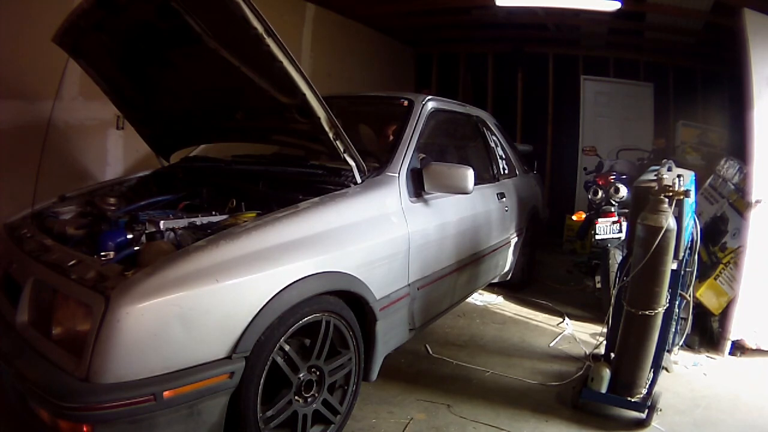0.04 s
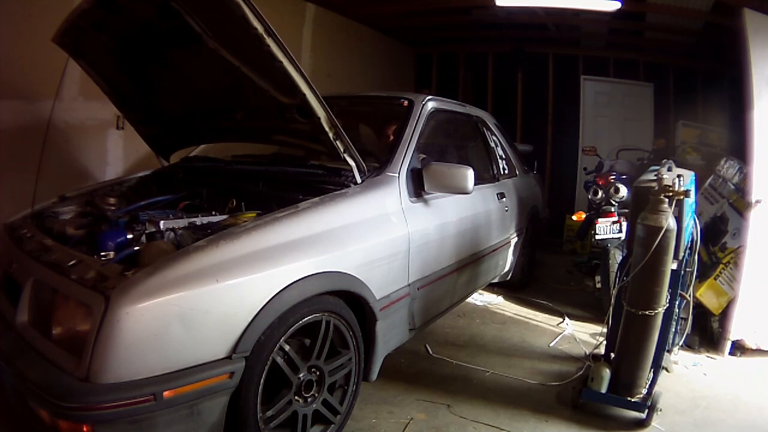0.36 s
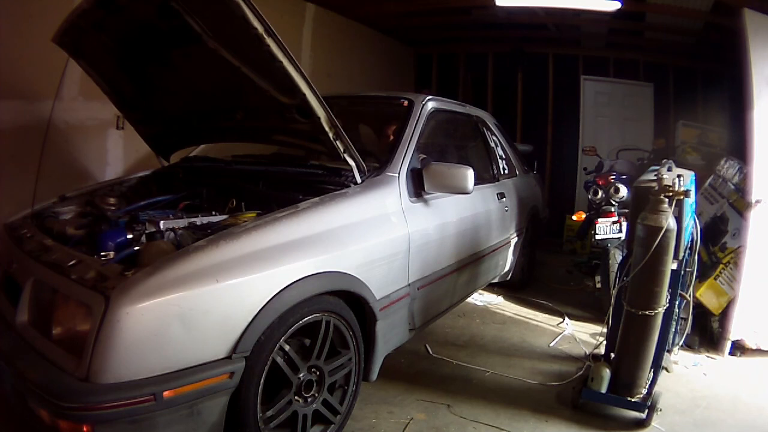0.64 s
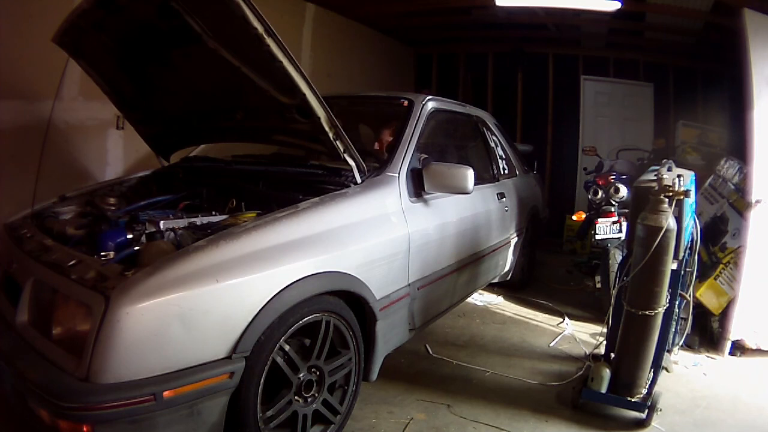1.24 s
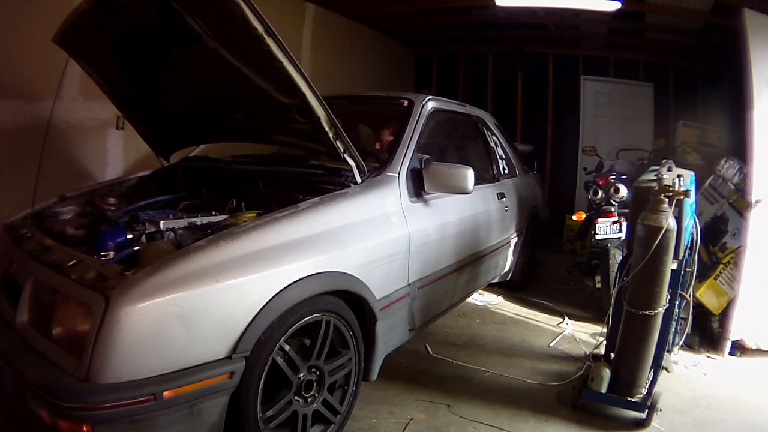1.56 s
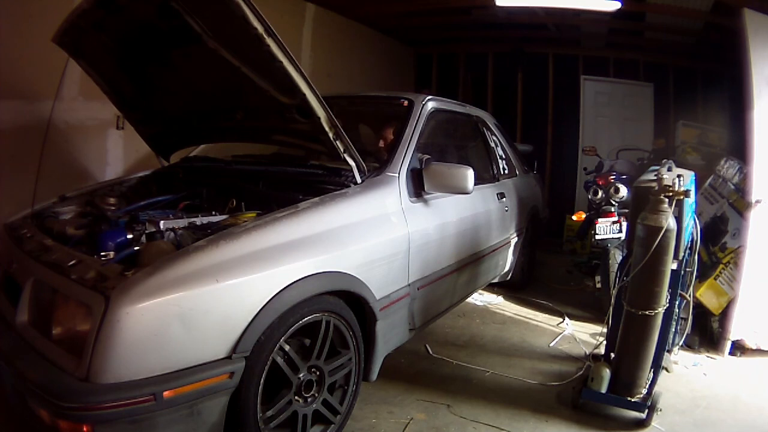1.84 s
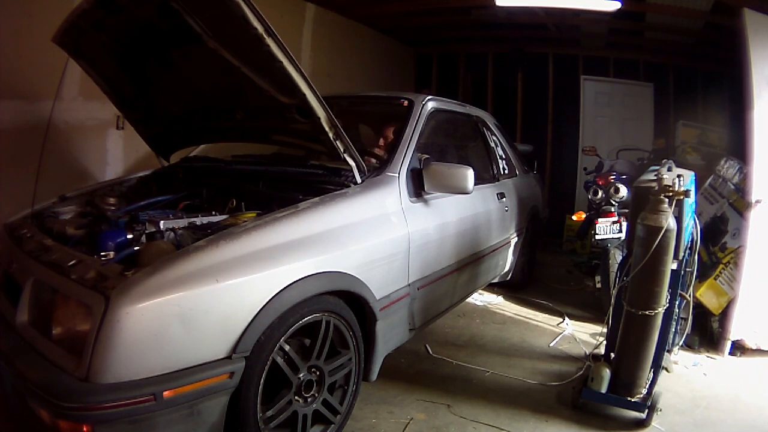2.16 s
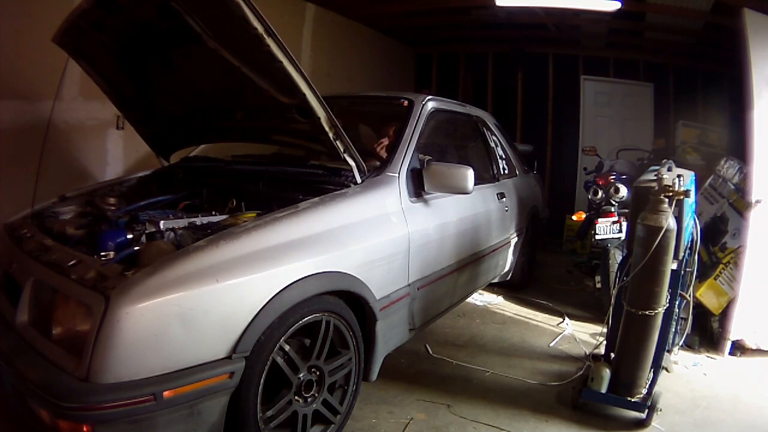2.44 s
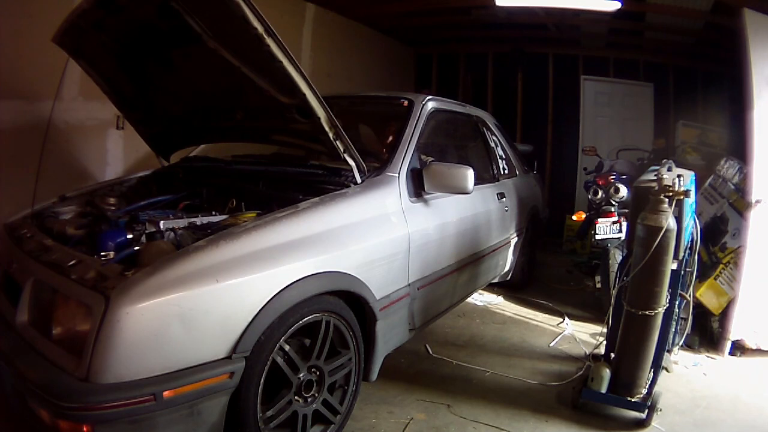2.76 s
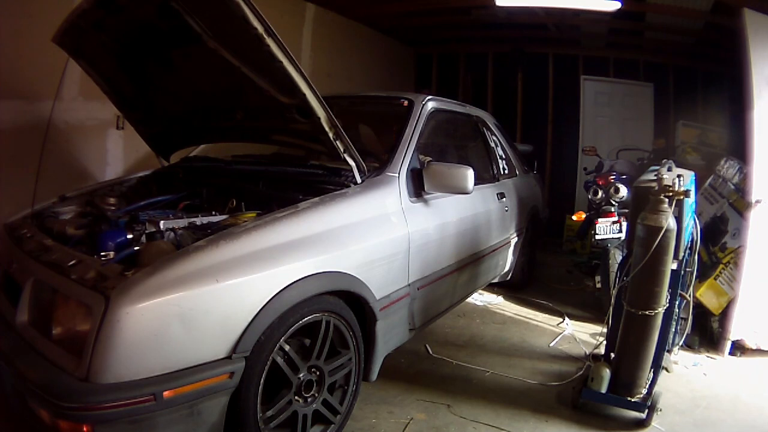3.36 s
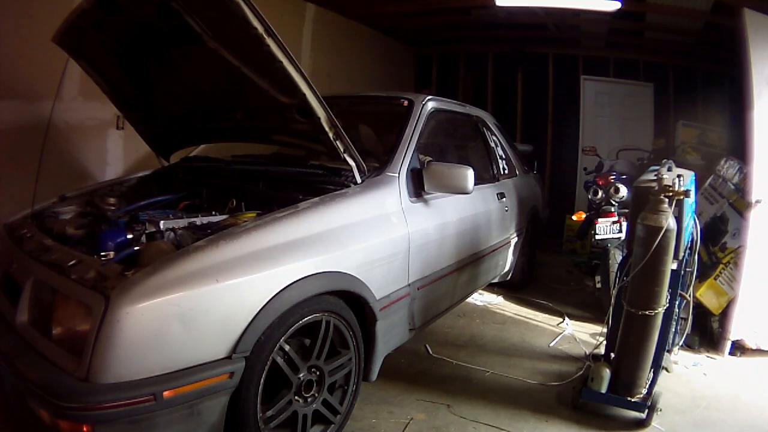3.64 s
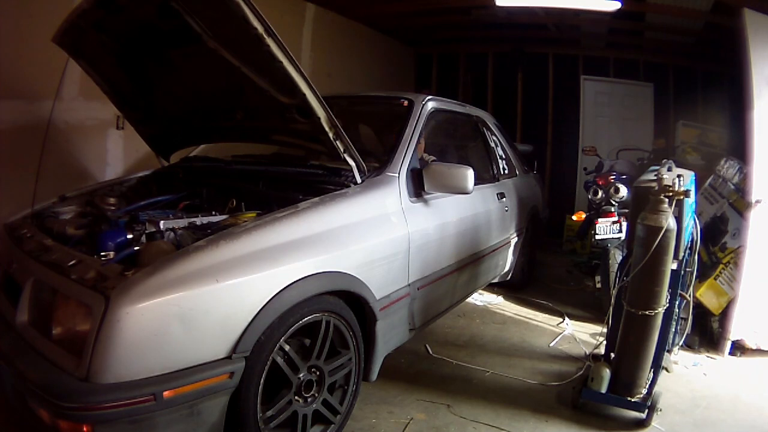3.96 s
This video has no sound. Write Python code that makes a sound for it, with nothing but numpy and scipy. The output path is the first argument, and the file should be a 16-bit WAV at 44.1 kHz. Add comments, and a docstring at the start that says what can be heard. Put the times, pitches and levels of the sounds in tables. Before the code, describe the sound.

A car engine in a garage is already lightly revved and slows over the first 1.4 seconds, firing unevenly while a soft belt whirr fades. From about 0.7 to 1.3 seconds the exhaust swells into a low, rumbling moan. From 1.5 seconds to the end at 4 seconds, it holds a deep, even, throbbing idle, with soft fan hiss and faint valve ticking behind it.

```python
"""A lightly revved four-cylinder car engine sinks to a steady idle, hood raised, in a garage.
While it slows the firings limp, then the exhaust moans; at idle they settle into an even, deep throb.
Each firing thumps the silencer and rings the pipe. Behind that the block growls,
belts and fan hiss in step with the speed, and the valve gear ticks faintly on its cover."""
import sys
import numpy as np
from scipy import signal
from scipy.fft import rfft, irfft
from scipy.io import wavfile

SR = 44100
rng = np.random.default_rng(int(sys.argv[2]) if len(sys.argv) > 2 else 0)


def wav_record(signal):
    """Record a signal, one row per channel, as 16-bit PCM in the file named by sys.argv[1]."""
    frames = np.transpose(np.atleast_2d(signal))
    bounded = np.clip(frames, -1, 1)
    # unit amplitude maps onto the largest positive 16-bit level
    quanta = np.round(bounded * 32767).astype(np.int16)
    wavfile.write(sys.argv[1], SR, quanta)


N = 176400
IDLE_START = int(1.5 * SR)


def undb(db):
    """Decibels to gain."""
    return 10 ** (np.asarray(db) / 20)


def unit_idle(x):
    """Scale to rms 1 at idle."""
    return x / np.std(x[IDLE_START:])


def unit_slowing(x):
    """Scale to rms 1 before idle."""
    return x / np.std(x[:IDLE_START])


def curve(table, t, column=1):
    """One column of a time table, linearly interpolated."""
    rows = np.array(table)
    return np.interp(t, rows[:, 0], rows[:, column])


def ring(x, modes):
    """Steep resonances that build up and die away smoothly."""
    f = np.arange(1, N + 2) * SR / (2 * N)
    response = sum(undb(db) / (1 + 1j * (f * f - hz * hz) / (f * width)) ** 2 for hz, width, db in modes)
    return irfft(rfft(x, 2 * N) * response)[:N]


def noise(spectrum):
    """Shaped noise, rolled off below the spectrum's first point."""
    hz, db = np.array(spectrum).T
    f = np.arange(1, N // 2 + 2) * SR / N
    gain = undb(np.interp(np.log(f), np.log(hz), db)) * np.minimum(f / hz[0], 1) ** 2
    return unit_idle(irfft(rfft(rng.standard_normal(N)) * gain, N))


def pulses(times_s, sizes):
    """Impulse train; negative times wrap round so their ringing carries in."""
    return np.bincount(np.round(times_s * SR).astype(int) % (2 * N), sizes, 2 * N)


def firings(t, cycle, lead_in=8):
    """Index and time of every firing, from a few before the start."""
    k = np.arange(-lead_in, int(cycle[-1]) + 1)
    return k, np.interp(k, cycle, t) + np.minimum(k - cycle[0], 0) / ENGINE_SPEED[0][1]


# pulley, then valve-cover whine: freq_hz, width_hz, gain_db
WHINE_MODES = [(1007, 33, 0), (1811, 85, 0)]
# their envelopes: time_s, pulley_db, cover_whine_db
WHINE_LEVELS = [(0, -58, -65), (.2, -59, -69), (.5, -62, -64), (.65, -68.5, -64), (1.5, -77, -63.5),
                (2, -80.5, -66.5), (2.4, -78, -71.5), (4, -82.5, -69)]


def whines(t):
    """A pulley sings at speed; a steady valve-cover whine stands out as the engine reaches idle."""
    return sum(unit_idle(ring(rng.standard_normal(N), [mode])) * undb(curve(WHINE_LEVELS, t, column))
               for column, mode in enumerate(WHINE_MODES, 1))


# ticks over one camshaft turn: gain_db
VALVE_TICKS = [1.5, -1, 1.5, -1, 3, -3.5, 9.5, -4.5]
# valve cover: freq_hz, width_hz, gain_db
COVER_MODES = [(1298, 6.1, 4), (1776, 30, -1.5), (1848, 68, -6.5), (2576, 80, -1), (2777, 260, -6.5),
               (5800, 4300, -29)]
TICK_DB, TICK_SCATTER_DB, TICK_DECAY_S, TICK_DB_PER_OCTAVE = -65, 5, 0.039, 7


def valves(t, cycle, firing_hz):
    """Two ticks per firing ring the valve cover, harder at speed and smeared by the garage walls."""
    k = np.arange(int(2 * cycle[-1]))
    tick_db = np.array(VALVE_TICKS)[k % len(VALVE_TICKS)] + TICK_SCATTER_DB * rng.standard_normal(len(k))
    ticks = pulses(np.interp(k / 2, cycle, t), undb(tick_db))[:N]
    envelope = signal.lfilter([1], [1, -np.exp(-1 / (TICK_DECAY_S * SR))], ticks)
    cover = unit_idle(ring(envelope * rng.standard_normal(N), COVER_MODES))
    return cover * undb(TICK_DB + TICK_DB_PER_OCTAVE * np.log2(firing_hz / firing_hz[-1]))


# engine bay: time_s, hiss_db, growl_db
BAY_LEVELS = [(0, -46, -43), (.25, -47.5, -46.5), (.56, -51.5, -47.5), (.95, -54.5, -48.5),
              (1.3, -56, -51.5), (1.6, -56.5, -51), (2.2, -57.5, -51.5), (3, -58, -53), (4, -58, -52)]
# belt and fan hiss: freq_hz, density_db
HISS_SPECTRUM = [(700, -13), (1100, -3.5), (1550, -2), (2100, 0), (2800, -1), (3700, -4.5), (4300, -6.5),
                 (4900, -12.5), (5900, -12.5), (7000, -16), (7800, -22), (9000, -22.5), (10500, -34.5),
                 (14500, -53)]
# belt and pulley rings at speed: freq_hz, width_hz, gain_db
WHIRR_MODES = [(647, 98, 3), (1480, 28, 6), (2463, 71, -1.5), (3280, 140, -2.5), (3470, 210, 1.5),
               (3645, 170, 0), (3370, 900, -1), (5550, 1300, -10.5)]
HISS_TRIM_DB, HISS_FIRING_DEPTH, HISS_CAM_DEPTH = -0.85, 0.029, 0.038
WHIRR_DB, WHIRR_DB_PER_OCTAVE = -46, 32.5


def belts(t, cycle, firing_hz):
    """Belts and fan hiss; the pulleys whirr while the engine still turns fast."""
    swell = 1 + HISS_FIRING_DEPTH * np.cos(2 * np.pi * cycle) + HISS_CAM_DEPTH * np.sin(np.pi * cycle / 2)
    hiss = noise(HISS_SPECTRUM) * swell * undb(HISS_TRIM_DB + curve(BAY_LEVELS, t))
    whirr = unit_idle(sum(ring(rng.standard_normal(N), [mode]) for mode in WHIRR_MODES))
    return hiss + whirr * undb(WHIRR_DB + WHIRR_DB_PER_OCTAVE * np.log2(firing_hz / firing_hz[0]))


# engine block: freq_hz, density_db
GROWL_SPECTRUM = [(120, 5.5), (250, 3.5), (330, 3), (420, -0.5), (530, -1.5), (620, 3.5), (720, -6),
                  (900, -11), (1200, -24), (2000, -56.5)]
GROWL_TRIM_DB, GROWL_CRANK_DEPTH = 4, 0.04


def block(t, cycle):
    """The block growls, swelling once per crankshaft turn."""
    swell = 1 + GROWL_CRANK_DEPTH * np.cos(np.pi * cycle)
    return noise(GROWL_SPECTRUM) * swell * undb(GROWL_TRIM_DB + curve(BAY_LEVELS, t, column=2))


# broad exhaust resonances: freq_hz, width_hz, gain_db
MOAN_RESONANCES = [(78.5, 25, 0), (113.3, 19.3, 0), (161.3, 27, 0)]
# their envelopes: time_s, low_db, mid_db, high_db
MOAN_LEVELS = [(0, -45.5, -36.5, -33.5), (.13, -48, -35, -37), (.25, -59, -41, -32), (.64, -56, -45.5, -45),
               (.71, -33, -23, -27), (.8, -32.5, -33.5, -27.5), (.87, -30, -33.5, -37),
               (.98, -31.5, -30, -32.5), (1.1, -45, -37.5, -40), (1.22, -39, -34.5, -28.5),
               (1.33, -46, -46, -38), (1.45, -72.5, -78, -67)]
MOAN_SCATTER_DB, MOAN_SCATTER_MS = 2.5, 0.42


def moan(t, cycle):
    """Uneven firings set the exhaust rumbling as the engine catches itself above idle."""
    k, fire_s = firings(t, cycle)
    time_draw, level_draw = rng.standard_normal((len(k), 2)).T
    puffs = pulses(fire_s + MOAN_SCATTER_MS * time_draw / 1000, undb(MOAN_SCATTER_DB * level_draw))
    return -sum(unit_slowing(ring(puffs, [mode])) * undb(curve(MOAN_LEVELS, t, column))
                for column, mode in enumerate(MOAN_RESONANCES, 1))


# exhaust drone: freq_hz, width_hz, gain_db
DRONE_MODES = [(157.1, 16.7, 2), (183.3, 11, 0), (290, 18.4, -12.5)]
# its envelope: time_s, level_db
DRONE_LEVELS = [(0, -30), (.2, -33), (.42, -27.5), (.62, -34), (.75, -39), (.9, -34.5), (1.24, -43),
                (1.4, -42), (1.6, -70)]


def drone(t, puffs):
    """Ragged firings excite a drone while the engine slows."""
    return unit_slowing(ring(puffs, DRONE_MODES)) * undb(curve(DRONE_LEVELS, t))


# combustion: time_s, boom_db, pipe_db, limp_db
COMBUSTION = [(0, -1, -2, 1.5), (.06, 0, -18, 1.5), (.15, -7, -7, 7.5), (.35, -10, -6, 6.5),
              (.5, -6, -2.5, 5), (.62, -10.5, -5.5, 3), (.72, -5.5, -14.5, 2), (.85, -10.5, -6, 5),
              (1.05, -8.5, -9, 2.5), (1.2, -7, -4, 2.5), (1.3, -7, -6, 1.5), (1.42, -3, -3.5, 0.5),
              (2.1, -4, -2, 1), (2.5, -5.5, -2.5, 0), (2.8, -4.5, -2.5, 2), (2.95, -5.5, -2, 1),
              (3.4, -4.5, -2, 1), (4, -5, -6, 1)]
# cylinders in firing order: boom_db, pipe_db, pipe_lag_ms
CYLINDER_OFFSETS = [(-0.5, 3.25, -.9), (1.5, -3, -0.54), (-1.9, 1.5, -1.8), (-0.3, 1.9, -0.19)]
# silencer and garage boom: freq_hz, width_hz, gain_db
BOOM_MODES = [(33.2, 17.7, -0.5), (60.8, 21.2, -1.5), (204.2, 12.6, -10), (242.1, 9.4, -20)]
# exhaust pipe: freq_hz, width_hz, gain_db
PIPE_MODES = [(112.67, 11.6, 4.5), (138.73, 10.2, -5.5), (151.4, 8.3, -2), (166.47, 10, 1),
              (193.3, 10, -12), (292.7, 6.2, -14), (312.7, 12, -20.5), (357.4, 40, -25)]
BOOM_IDLE_DB, PIPE_IDLE_DB = -24.5, -33
SCATTER_DB, SCATTER_MS, PIPE_SCATTER_DB = 0.87, 0.085, 1.3
PIPE_LIMP_SHARE, LIMP_MS_PER_DB = 0.47, 0.78


def exhaust(t, cycle):
    """Firings thump the silencer and ring the pipe; a limp weakens every second thump and jolts timing."""
    k, fire_s = firings(t, cycle)
    time_draw, boom_draw, pipe_draw = rng.standard_normal((len(k), 3)).T
    boom_db, pipe_db, pipe_lag_ms = np.array(CYLINDER_OFFSETS)[k % len(CYLINDER_OFFSETS)].T
    limp_db = curve(COMBUSTION, fire_s, column=3)
    swing_db = limp_db * (k % 2 - .5)
    fire_s += (SCATTER_MS + LIMP_MS_PER_DB * limp_db) * time_draw / 1000
    pipe_s = fire_s + pipe_lag_ms / 1000
    boom_db += curve(COMBUSTION, fire_s, column=1) + swing_db + SCATTER_DB * boom_draw
    pipe_db += curve(COMBUSTION, fire_s, column=2) - PIPE_LIMP_SHARE * swing_db
    pipe_db += PIPE_SCATTER_DB * pipe_draw
    boom = unit_idle(ring(pulses(fire_s, undb(boom_db)), BOOM_MODES))
    pipe = unit_idle(ring(pulses(pipe_s, undb(pipe_db)), PIPE_MODES))
    puffs = pulses(pipe_s, undb(PIPE_LIMP_SHARE * swing_db + SCATTER_DB * pipe_draw))
    return -(drone(t, puffs) + undb(BOOM_IDLE_DB) * boom + undb(PIPE_IDLE_DB) * pipe)


# engine speed: time_s, firing_hz
ENGINE_SPEED = [(0.0, 54.25), (0.3, 46.15), (0.6, 42.2), (0.75, 40.6), (1.0, 38.22), (1.25, 35.15),
                (1.42, 33.39), (1.75, 33.49), (2.05, 33.38), (2.3, 34.4), (2.52, 34.01), (2.7, 34.67),
                (2.97, 34.52), (3.12, 34.44), (3.35, 34.12), (3.6, 35.1), (4.0, 33.6)]
FIRST_FIRING_CYCLES = 0.64


def scene():
    """One crankshaft times the firings, ticks and swells."""
    t = np.arange(N) / SR
    firing_hz = curve(ENGINE_SPEED, t)
    cycle = np.cumsum(firing_hz) / SR - FIRST_FIRING_CYCLES  # one cycle per firing
    mix = exhaust(t, cycle) + moan(t, cycle) + block(t, cycle)
    mix += belts(t, cycle, firing_hz) + whines(t) + valves(t, cycle, firing_hz)
    return mix[None]


def record(dry, cutoff_hz=15000):
    """A steep low-pass cuts the top treble."""
    return signal.sosfilt(signal.ellip(8, .2, 70, cutoff_hz, fs=SR, output="sos"), dry)


dry = scene()
out = record(dry)
wav_record(out)
```